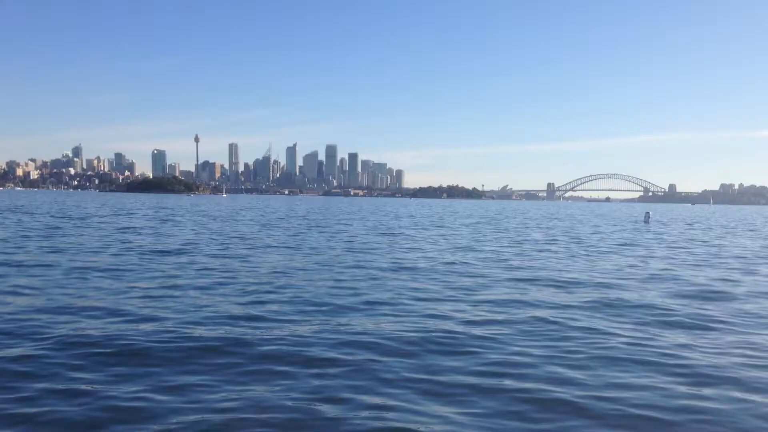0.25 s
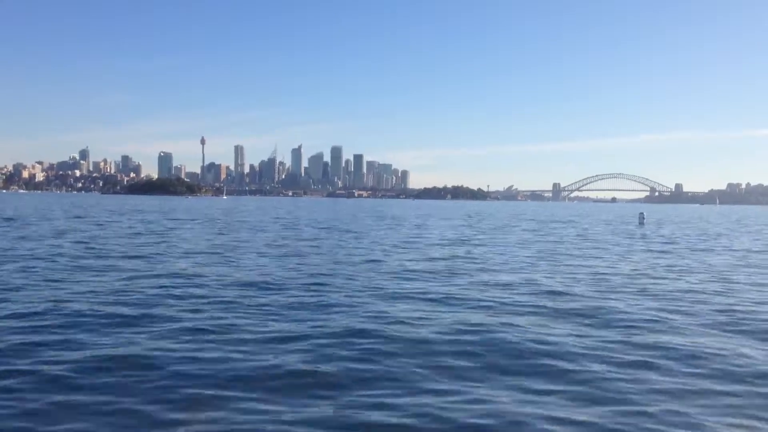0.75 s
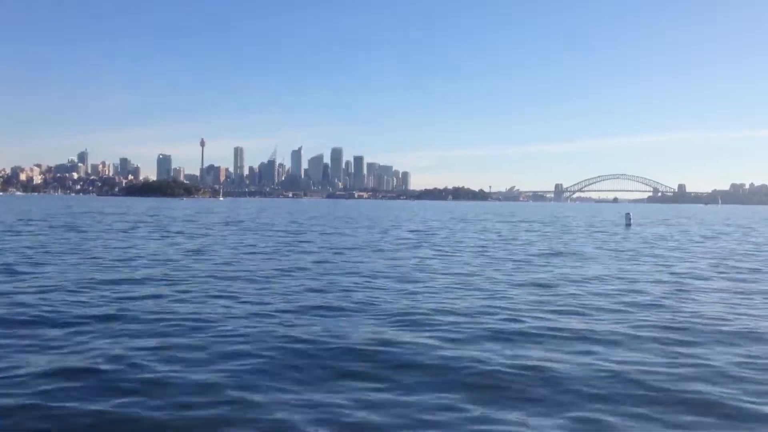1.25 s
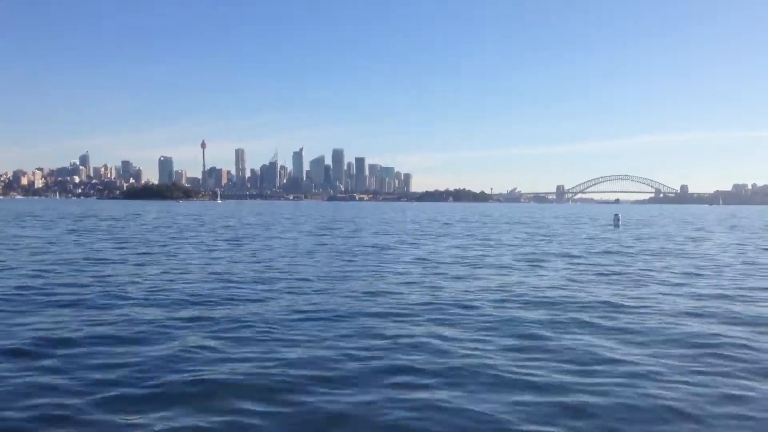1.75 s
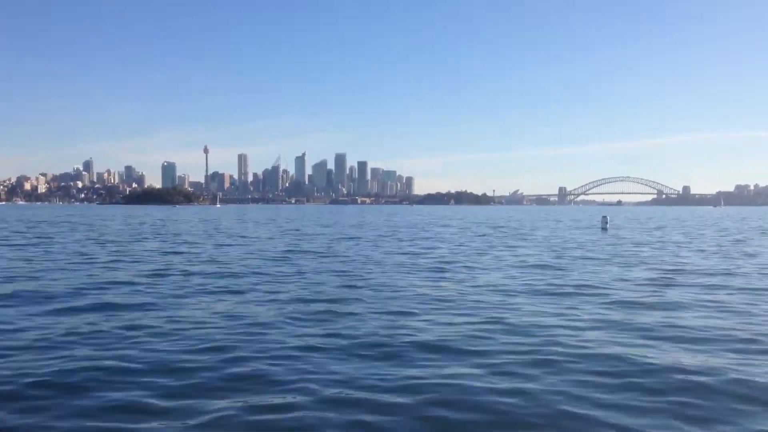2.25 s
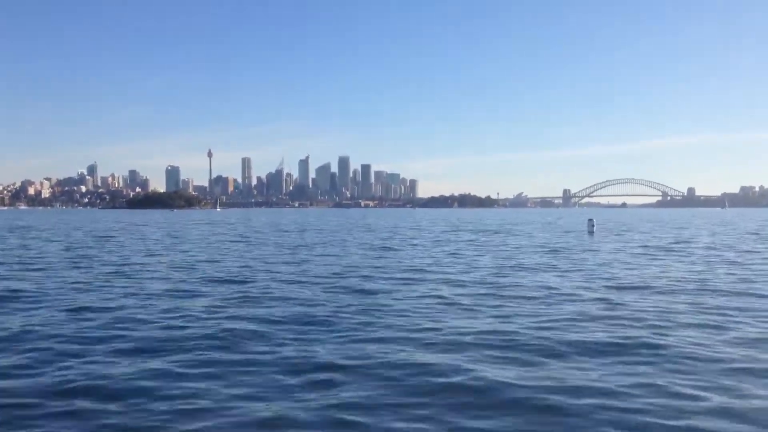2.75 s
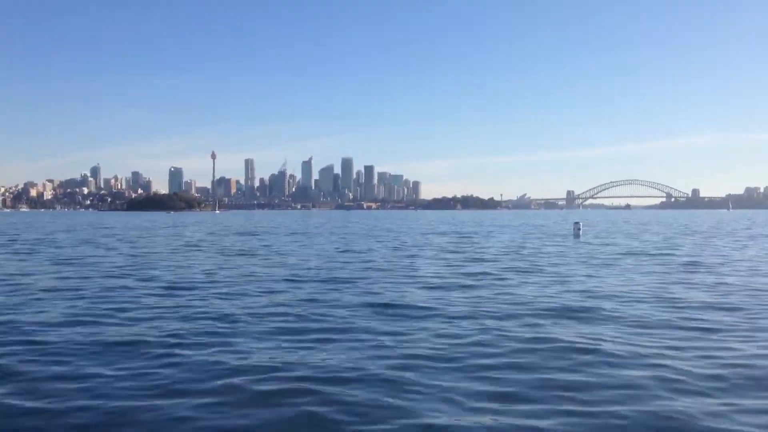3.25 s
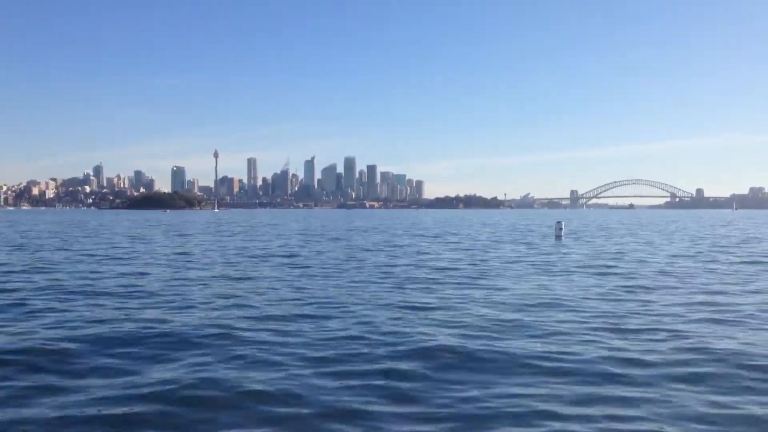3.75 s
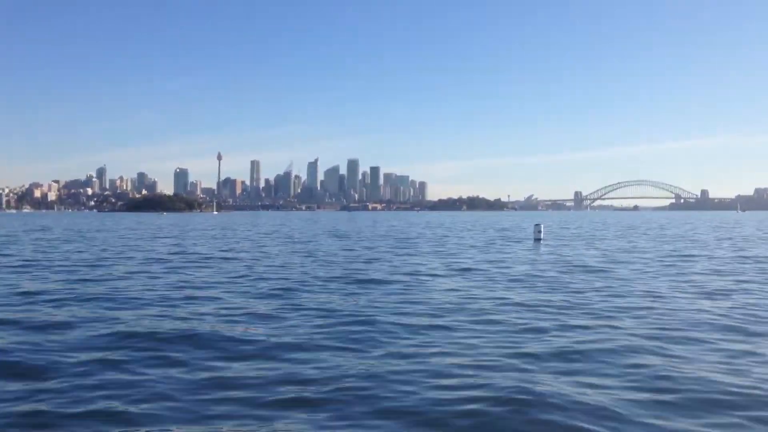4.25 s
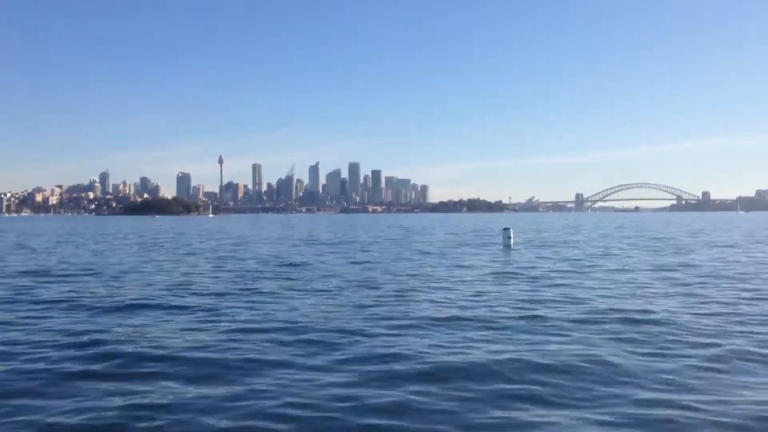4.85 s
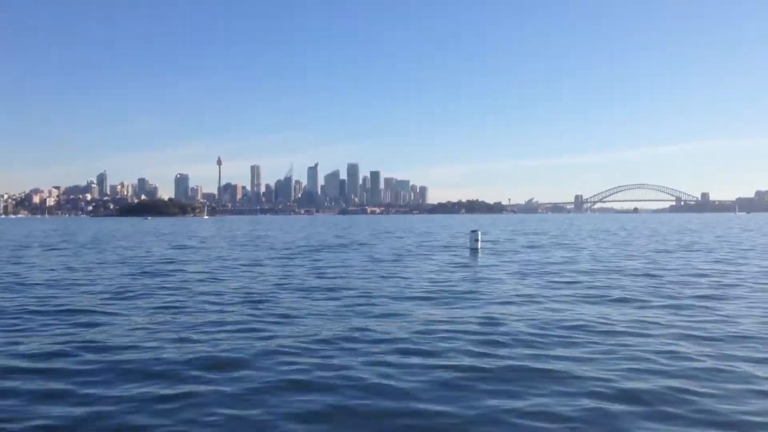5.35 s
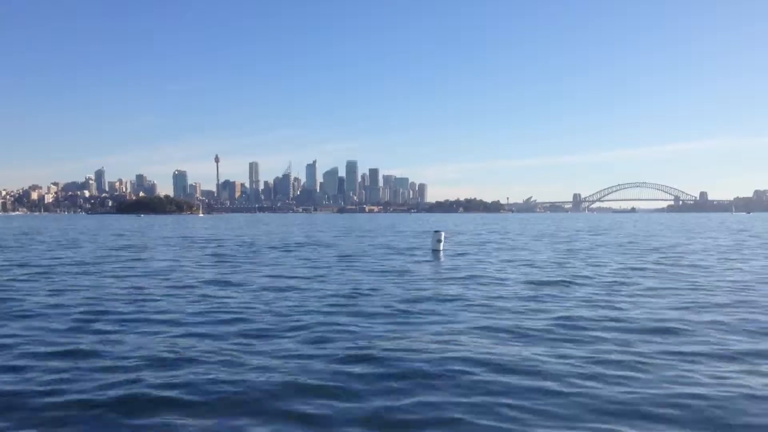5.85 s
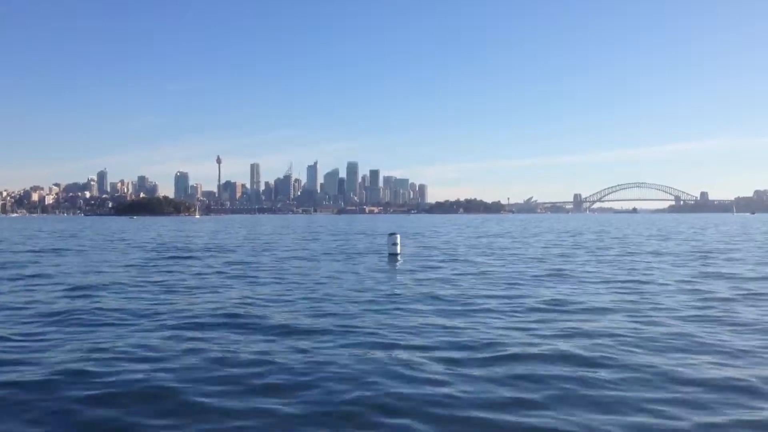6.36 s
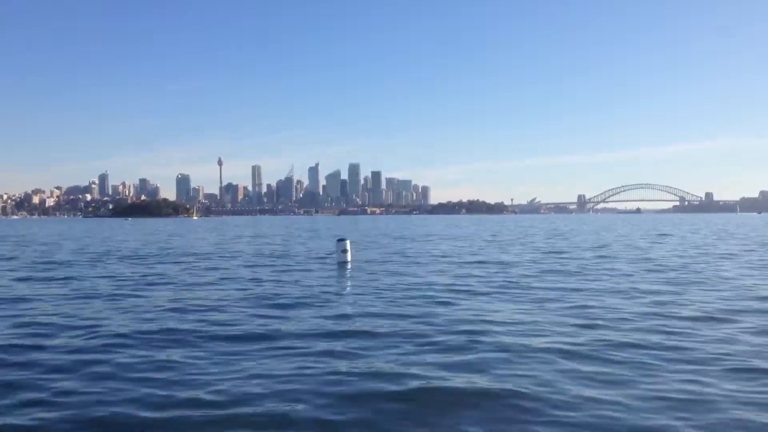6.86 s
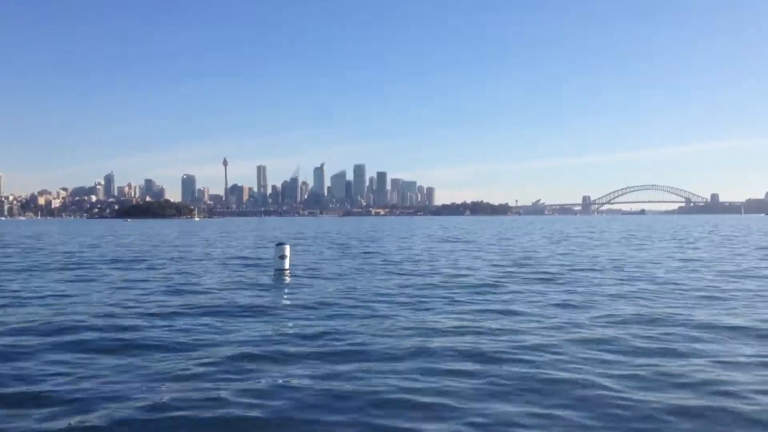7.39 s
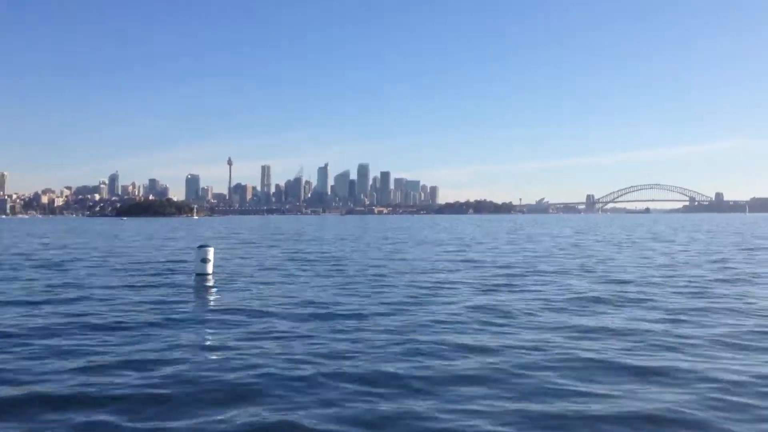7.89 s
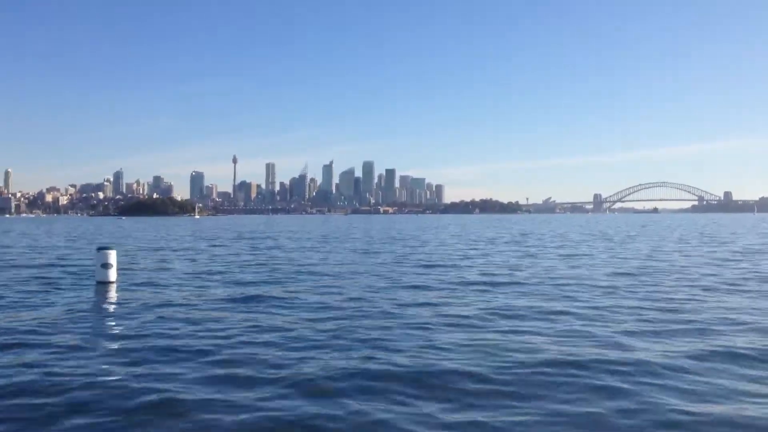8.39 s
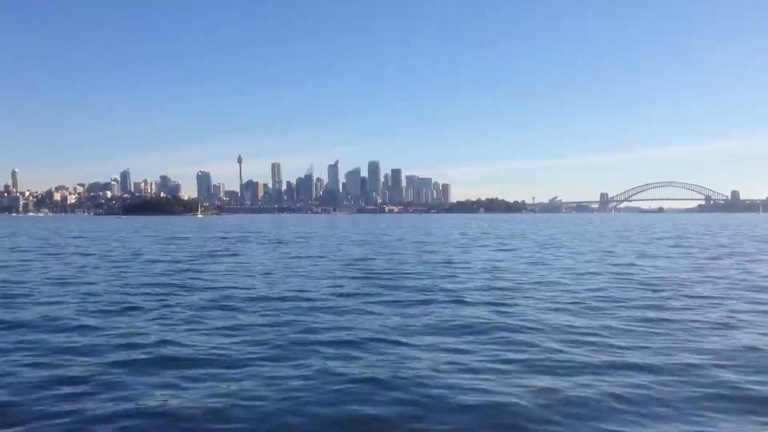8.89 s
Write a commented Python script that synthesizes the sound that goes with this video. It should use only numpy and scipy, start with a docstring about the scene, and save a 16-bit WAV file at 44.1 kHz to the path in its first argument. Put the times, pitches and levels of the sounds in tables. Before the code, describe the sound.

Wind buffets the microphone on the open deck of a moving boat, making a low, lumpy rumble with a sputtering crackle. Sharp snaps and dull knocks of air hit at irregular moments throughout. The wind eases slightly early on and soon returns; the snaps crowd together past the middle, and deeper knocks follow. A faint engine hum and the hiss of the wake stay in the background.

```python
"""Wind on the open deck of a moving boat. From the start, swirling air rumbles and crackles over the
microphone's opening in lumps and short bursts, while the wake hisses and the engine hums faintly behind.
Almost at once, single eddies (small whirls of air) begin to hit: sharp ones snap, dull ones knock.
The wind eases at half a second and is back by 2.5 s. Snaps crowd together near 5.5 s, and the deepest
knocks come from 6.5 to 8 s. All along, a limiter holds down the loudest peaks."""
import sys
import numpy as np
from scipy import signal
from scipy.fft import rfft, irfft, next_fast_len
from scipy.io import wavfile
from scipy.ndimage import uniform_filter1d, minimum_filter1d

SR = 44100
rng = np.random.default_rng(int(sys.argv[2]) if len(sys.argv) > 2 else 0)


def generate_wav(signal):
    """Clip the signal to [-1, 1] and save it as 16-bit WAV at the path in sys.argv[1]."""
    frames = np.transpose(np.atleast_2d(signal))
    scaled = np.clip(frames, -1, 1) * 32767
    pcm = np.round(scaled).astype(np.int16)
    wavfile.write(sys.argv[1], SR, pcm)


N = 402633

# How strong the wind is. Each row: time in seconds, level of the rumble in dB.
WIND_STRENGTH = [(0.0, -14), (0.29, -16), (0.49, -19), (0.82, -17.5), (1.11, -17), (1.65, -17),
                 (1.8, -16.5), (2.0, -18.5), (2.25, -16), (2.49, -14.5), (2.94, -15), (3.26, -16.5),
                 (3.72, -15.5), (4.24, -16.5), (4.58, -14.5), (5.34, -15), (6.47, -14), (6.64, -15),
                 (7.96, -14), (8.26, -15.5), (8.7, -15.5), (9.12, -15)]
# The tone of the wind's low rumble. Each row: frequency in Hz, relative level per Hz in dB.
RUMBLE_SPECTRUM = [(12, -48.5), (20, -37.5), (40, -12.5), (67, -0.5), (110, 0), (160, -1), (250, -2),
                   (350, -6), (510, -7), (750, -15), (985, -23), (1800, -32.5), (2340, -65)]
# The tone of the wind's crackle. Each row: frequency in Hz, relative level per Hz in dB.
CRACKLE_SPECTRUM = [(600, -1), (900, 3), (1300, -1.5), (2000, -5.5), (3000, -12), (3800, -17),
                    (4800, -27.5), (6000, -49.5), (8000, -56.5)]
# The tone of the wake's hiss. Each row: frequency in Hz, relative level per Hz in dB.
WAKE_SPECTRUM = [(3000, -0.5), (4500, 0.5), (6000, -5.5), (8200, -7), (9500, -11.5), (10800, -18),
                 (12200, -23.5), (14000, -26), (16000, -23.5)]
# Buffets (short bursts of wind) and lulls. Each row: time of the middle in seconds, change of level
# in dB (below zero for a lull), width of the lead-up in seconds.
BUFFETS_AND_LULLS = [(0.014, 8.5, 0.015), (0.053, -6.5, 0.02), (0.27, 6, 0.012), (0.343, 9, 0.0057),
                     (0.835, 3.5, 0.041), (1.066, 9, 0.0075), (1.096, -7.5, 0.017), (1.243, 4.5, 0.0054),
                     (1.423, -12, 0.0052), (1.606, 1.5, 0.029), (1.7, 6, 0.011), (1.807, -3, 0.02),
                     (2.123, -2, 0.019), (2.185, 4, 0.012), (2.247, 7.5, 0.0058), (2.283, -5, 0.008),
                     (2.372, 5.5, 0.014), (2.457, -6, 0.018), (2.537, -5, 0.008), (2.6, 5, 0.0096),
                     (2.755, 2.5, 0.023), (2.793, -4, 0.008), (2.91, 3.5, 0.011), (3.021, 7.5, 0.009),
                     (3.157, -7, 0.018), (3.409, 7, 0.008), (3.752, 3, 0.025), (3.9, 2.5, 0.0086),
                     (3.92, -2, 0.0068), (4.06, 3.5, 0.0051), (4.243, 3, 0.014), (4.554, 3.5, 0.041),
                     (4.722, 11.5, 0.0051), (5.14, 8, 0.0043), (5.345, -6.5, 0.009), (5.414, -5, 0.0062),
                     (5.505, -1.5, 0.018), (5.757, 2, 0.014), (5.862, -7.5, 0.0057), (5.986, -5, 0.0081),
                     (6.08, 1, 0.0039), (6.533, 5.5, 0.011), (6.674, -4, 0.02), (6.856, 6, 0.012),
                     (6.936, 6, 0.013), (7.09, -7.5, 0.014), (7.16, 2, 0.016), (7.345, -3, 0.013),
                     (7.436, 4.5, 0.013), (7.783, -11, 0.0045), (7.964, 8, 0.005), (8.038, 6, 0.0052),
                     (8.472, -4.5, 0.009), (8.552, 13.5, 0.0056), (8.565, -6, 0.011), (8.944, 7.5, 0.0026),
                     (9.027, -5.5, 0.03)]
# The sharpest eddies. Each row: start in seconds, peak level of the ring in dB, pitch in Hz,
# level of the bright crack in dB compared with that peak.
SHARP_EDDIES = [(0.081, -18, 2880.0, -19), (0.1992, -19, 2620, -16), (0.3382, -18, 2300, -5),
                (0.2325, -22, 3200, -14), (0.3792, -34, 3200, -12), (0.395, -33, 2800, -14),
                (0.6334, -16, 2240.0, -25.1), (0.77, -17.5, 3000, -23), (0.835, -13, 2220, -24),
                (0.9592, -22, 2420.0, -22.6), (0.9638, -13, 2430.0, -19), (1.1813, -14.5, 2200.0, -24),
                (1.3705, -14.5, 2380, -24), (1.4813, -20, 2410.0, -18.3), (1.5762, -20, 2400, -8),
                (1.6453, -11.5, 3070, -17), (1.6755, -16, 2130, -20.4), (1.6993, -21, 2490.0, -23.1),
                (1.7031, -16, 2570.0, -12), (1.871, -22, 2820.0, -17.2), (1.8742, -6, 2340, -27),
                (2.0221, -19, 2410.0, -20.4), (2.0423, -15.5, 2380.0, -19.1), (2.1853, -20, 2250.0, -28.6),
                (2.2403, -17.5, 3330, 3.5), (2.2561, -14, 2070, -21.8), (2.2626, -20, 2110.0, -27.2),
                (2.3713, -19.5, 2280.0, -22.1), (2.388, -15, 2610.0, -15.7), (2.4022, -6.5, 3140, -29),
                (2.6066, -15, 2350, -23.1), (2.6503, -14, 2000, -22.6), (2.6854, -16, 2330.0, -18),
                (2.7716, -16, 2080.0, -25), (2.8247, -19, 2300, -16), (2.9576, -13, 2150, -26),
                (2.9628, -20.0, 2690.0, -20.1), (3.0474, -15, 2260.0, -19), (3.1212, -6.5, 3530, -26),
                (3.4758, -15.5, 2360, -24), (4.0467, -17.5, 2490.0, -22.4), (4.1336, -12.5, 2870, -21),
                (4.4863, -18, 2540.0, -21.6), (4.5633, -8, 3630, -28), (4.6146, -20, 2180.0, -21.7),
                (4.6731, -14, 1970.0, -26), (4.6914, -19, 2300, -23), (4.8745, -11, 2450, -23),
                (5.2637, -22, 2200.0, -26.4), (5.3851, -15, 2360.0, -19), (5.44, -15.5, 3130, -12),
                (5.4543, -23, 2870.0, -15), (5.4679, -18, 2480.0, -8), (5.5002, -18, 2400, -9),
                (5.5078, -19, 2200, -18), (5.5367, -21, 2330.0, -26.9), (5.5508, -10, 1900, -24),
                (5.56, -13, 2350.0, -18), (5.5634, -8.5, 2800, -25), (5.5719, -18, 2500, -27),
                (5.5887, -18, 2300.0, -21.6), (5.5941, -13, 2550.0, -12), (5.6347, -18, 2200.0, -19.3),
                (5.6586, -18, 2750, -7), (5.7587, -17, 2010.0, -25.9), (5.9495, -18, 2320.0, -7),
                (6.0009, -13.5, 2070.0, -33.2), (6.0351, -17, 2130.0, -24), (6.2931, -10, 2200.0, -17),
                (6.4636, -17, 2760.0, -22.6), (6.4674, -19, 2420.0, -17), (6.5338, -13.5, 2370.0, -12),
                (6.7281, -9, 2800, -16), (6.8496, -11.5, 2580, -26), (6.9291, -16, 2070.0, -17),
                (7.3737, -16, 2800, -10), (7.4738, -21, 3180.0, -19), (7.5223, -11.5, 2360.0, -26.9),
                (7.5428, -22, 2510.0, -18.3), (7.7412, -21, 2130.0, -21.9), (7.7495, -11, 2420.0, -26),
                (7.7696, -18, 2360.0, -14.9), (7.8428, -12.5, 2250, -28), (7.9698, -9.5, 2230, -19),
                (8.2166, -16, 2710.0, -22), (8.254, -20, 2950, -22), (8.5507, -16, 2440, -18.1),
                (8.6594, -8, 3000, -21), (8.7362, -26, 2020.0, -28.4), (8.8235, -23, 2220, -31.1),
                (8.8888, -22, 2670, -20)]
# Dull eddies, heard as short knocks. Each row: start in seconds, level in dB, pitch in Hz.
DULL_EDDIES = [(0.116, 2, 435), (1.535, -13, 480), (2.211, -8, 714), (2.241, -16, 557), (2.26, -4.5, 613),
               (2.33, -11, 520), (2.559, -7, 480), (2.69, -15, 430), (2.738, -7, 590), (2.823, -9, 622),
               (2.925, -21, 507), (3.676, -19, 660), (4.673, -4, 450), (4.7, -6, 586), (4.927, -13, 440),
               (5.01, -4.5, 635), (5.206, -6, 453), (5.466, -6, 536), (5.536, -5, 483), (6.0, -7, 533),
               (6.032, -2.5, 460), (6.234, -14, 546), (6.499, -10, 150), (6.524, -8, 169), (6.692, -6, 170),
               (6.829, -4, 202), (6.887, -6, 417), (7.13, -4, 110), (7.409, -6, 124), (7.422, -10, 125),
               (7.662, -14, 546), (7.831, -5, 260), (7.955, -4.5, 149), (8.034, -8, 626), (8.863, -24, 466),
               (8.934, -2, 396)]

CRACKLE_DB, WAKE_DB = -32.5, -51.5   # levels in average wind
ENGINE_HZ, ENGINE_DB = 101.1, -35
BODY_DB, BODY_HZ, BODY_WIDTH_HZ = -3, 1260, 1200   # the duller hollow behind the microphone's opening
CRACK_HZ, CRACK_WIDTH_HZ, CRACK_TOP_HZ = 5200, 2900, 5700   # the bright crack on top of a snap
RATTLE_FROM_HZ, RATTLE_SIZES = 2400, (0.37, 0.58)   # higher snaps get an extra jolt before and after
LIMIT, RELEASE_DB_PER_S, CUTOFF_HZ = .7, 62, 15270


def from_db(db):
    """Turn decibels into a number to multiply by."""
    return 10 ** (np.asarray(db) / 20)


def rms_one(x):
    """Scale a signal so that its average size (rms) is 1."""
    return x / np.sqrt(np.mean(x ** 2) + 1e-20)


def drift(rate_hz):
    """A smooth random wander of size about 1; a higher rate makes it move faster."""
    pole = np.exp(-40 * np.pi * rate_hz / SR)
    noise = rng.standard_normal(N // 20 + 2002)   # one value for every 20 samples
    slow = signal.lfilter([1], [1, -2 * pole, pole * pole], noise)[2000:]
    return np.interp(np.arange(N) / 20, np.arange(len(slow)), rms_one(slow - slow.mean()))


def bands(spectrum, make_noise):
    """Call make_noise(hz) for each half-octave band, then blend the bands and shape them to the spectrum."""
    hz, level_db = np.transpose(spectrum)
    size = next_fast_len(N + 8192)
    octave = np.log2(np.arange(1, size // 2 + 2) * SR / size)
    blend = 0
    for centre in np.arange(np.log2(hz[0]), np.log2(hz[-1]) + .5, .5):
        share = np.cos(np.pi * np.clip(octave - centre, -.5, .5))   # neighbours' powers add up to one
        blend = blend + share * rfft(rms_one(make_noise(2 ** centre)), size)
    tone = from_db(np.interp(octave, np.log2(hz), level_db))
    return rms_one(irfft(blend * tone, size)[:N])


def eddies(per_s, spread_db):
    """Whirls of air give random pressure kicks: many small, a few large, coming in clumps."""
    sizes = from_db(spread_db * np.minimum(rng.exponential(1, N), 4.0)) * rng.choice([-1, 1], N)
    happens = rng.random(N) < per_s * from_db(4 * drift(15)) / SR
    return sizes * happens + 1e-9


def turbulence(spectrum, lumps, kicks, lump_db, wander_db, kick_db):
    """Swirling flow: each band of noise wanders alone, and all but the lowest share lumps and kicks."""
    kicks = from_db(kick_db) * rms_one(kicks)

    def band_noise(hz):
        share = np.clip(np.log(hz / 50) / 3.1, 0, 1)   # higher bands (smaller eddies) react more
        noise = rng.standard_normal(N)
        swell_db = share * lump_db * lumps + wander_db * drift(min(hz / 12, 140))
        return from_db(swell_db) * (noise + share * kicks * np.sign(noise))   # kicks push or pull
    return bands(spectrum, band_noise)


def rumble(lumps):
    """Air swirling over the microphone's opening makes a low, lumpy noise."""
    kicks = eddies(per_s=90, spread_db=2.9)
    return turbulence(RUMBLE_SPECTRUM, lumps, kicks, lump_db=1.5, wander_db=2.5, kick_db=-0.5)


def crackle(lumps):
    """Hundreds of tiny eddies a second make a higher, sputtering noise."""
    kicks = eddies(per_s=350, spread_db=3.8)
    return turbulence(CRACKLE_SPECTRUM, lumps, kicks, lump_db=1.8, wander_db=1.2, kick_db=2.5)


def wake(lumps):
    """Churned water behind the boat hisses, and the wind carries the sound."""
    kicks = eddies(per_s=150, spread_db=2.0)
    return turbulence(WAKE_SPECTRUM, lumps, kicks, lump_db=1.0, wander_db=1.9, kick_db=-6.5)


def engine():
    """The engine's firing makes one low tone that wavers a little in pitch."""
    hz = ENGINE_HZ * (1 + 0.0039 * drift(1.45))
    return from_db(ENGINE_DB) * np.sqrt(2) * np.sin(2 * np.pi * np.cumsum(hz) / SR)


def buffets():
    """The wind's quick changes in dB: bell-shaped bursts and lulls, plus a slight random flutter."""
    swell_db, t = np.zeros(N), np.arange(N) / SR
    for middle_s, change_db, width_s in BUFFETS_AND_LULLS:
        near = slice(max(round((middle_s - .2) * SR), 0), round((middle_s + .2) * SR))
        lag = t[near] - middle_s
        side_s = np.where(lag < 0, width_s, 0.86 * width_s)   # each goes a bit faster than it comes
        swell_db[near] += change_db * np.exp(-.5 * (lag / side_s) ** 2)
    return swell_db + 0.27 * drift(2)


def resonance(x, hz, width_hz):
    """Make x ring around one pitch, with a peak of 1; a wider ring dies sooner."""
    pole = np.exp(-np.pi * width_hz / SR)
    ring = signal.lfilter([1, 0, -1], [1, -2 * pole * np.cos(2 * np.pi * hz / SR), pole * pole], x)
    return ring / np.abs(ring).max()


def small_snaps(count):
    """Rows like those of SHARP_EDDIES for weak snaps at random moments."""
    when, size, pitch = rng.random((count, 3)).T
    return list(zip(when * N / SR, -39 + 4 * size, 2310 * (.9 + .3 * pitch), -26 + 12 * pitch))


def snaps():
    """A sharp eddy jolts the opening and the hollow behind it into ringing, with a crack and a thump."""
    length = 900
    out, t = np.zeros(N + length), np.arange(length) / SR
    onset = (t / 0.00078) ** 2 / (1 + (t / 0.0008) ** 2)
    pressure_step = onset * np.sin(2 * np.pi * 285 * t) * np.exp(-t / 0.0012)   # quickly leaks away
    soften = signal.butter(4, CRACK_TOP_HZ, fs=SR, output="sos")
    for start_s, peak_db, hz, crack_db in SHARP_EDDIES + small_snaps(20):
        jolt = np.zeros(length)
        jolt[30] = -1
        gaps = SR / hz * rng.uniform(.8, 1.2, 2)   # the rattle: about one cycle before and after
        rattle = np.clip((hz - RATTLE_FROM_HZ) / 800, 0, 1) * rng.uniform(.5, 1.5, 2) * RATTLE_SIZES
        rattled = jolt.copy()
        rattled[(30 + gaps * [-1, 1]).astype(int)] = -rattle
        opening = resonance(rattled, hz, width_hz=hz)
        body_gain = from_db(BODY_DB) * 2 * BODY_HZ / hz   # low snaps drive the hollow harder
        ring = opening - body_gain * resonance(jolt, BODY_HZ, BODY_WIDTH_HZ)
        ring = signal.sosfilt(signal.butter(4, 1.37 * hz, fs=SR, output="sos"), ring)
        crack = resonance(jolt, CRACK_HZ, CRACK_WIDTH_HZ)
        crack = signal.sosfilt(soften, resonance(crack, CRACK_HZ, CRACK_WIDTH_HZ))
        snap = from_db(peak_db) * (ring / np.abs(ring).max() + from_db(crack_db) * crack)
        thump = from_db(-13 + 0.21 * peak_db) * pressure_step   # grows only a little with the snap
        at = round(start_s * SR)
        out[at:at + length] += snap + thump
    return out[:N]


def knocks():
    """A dull eddy pushes or pulls for a couple of cycles, swelling quickly and fading more slowly."""
    length = 1800
    out, t = np.zeros(N + length), np.arange(length) / SR
    signs = rng.choice([-1, 1], len(DULL_EDDIES))
    for (start_s, level_db, hz), sign in zip(DULL_EDDIES, signs):
        age = t * hz / 0.39   # reaches 1 at the top of the swell
        swell = from_db(level_db) * age * np.exp(1 - age)
        at = round(start_s * SR)
        out[at:at + length] += sign * swell * np.sin(2 * np.pi * hz * t)
    return out[:N]


def scene():
    """Add up all the sounds at one microphone; rumble, crackle and hiss rise and fall with the wind."""
    wind_db = np.interp(np.arange(N) / SR, *np.transpose(WIND_STRENGTH))
    swing_db = wind_db - wind_db.mean()
    buffet_db = buffets()
    lumps = rms_one(drift(23.4) + 4 * drift(44))   # fast swells shared by all three noises
    mix = from_db(wind_db + buffet_db) * rumble(lumps)
    mix += from_db(CRACKLE_DB + 0.99 * swing_db + 0.74 * buffet_db) * crackle(lumps)
    mix += from_db(WAKE_DB + 0.83 * swing_db) * wake(lumps)
    return (mix + snaps() + knocks() + engine())[None]


def record(dry):
    """A limiter turns the sound down just ahead of loud peaks and lets go fast; the top treble is cut."""
    over_db = np.maximum(20 * np.log10(np.abs(dry[0]) / LIMIT + 1e-9), 0)
    release_db = RELEASE_DB_PER_S * np.arange(N) / SR
    held_db = np.maximum.accumulate(over_db + release_db) - release_db
    ahead_db = uniform_filter1d(-minimum_filter1d(-held_db, size=129), size=129)
    treble_cut = signal.ellip(12, .5, 70, CUTOFF_HZ, fs=SR, output="sos")
    return signal.sosfilt(treble_cut, dry * from_db(-ahead_db))


dry = scene()
out = record(dry)
generate_wav(out)
```